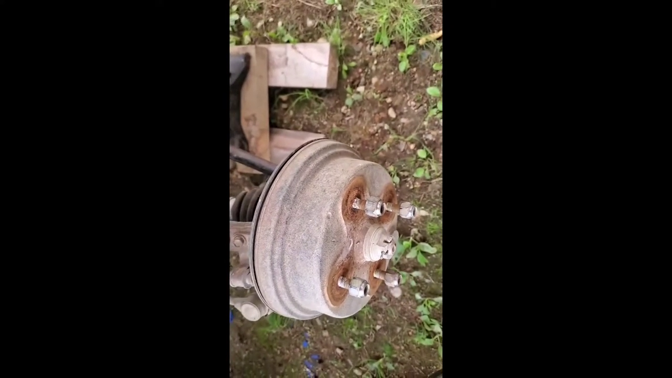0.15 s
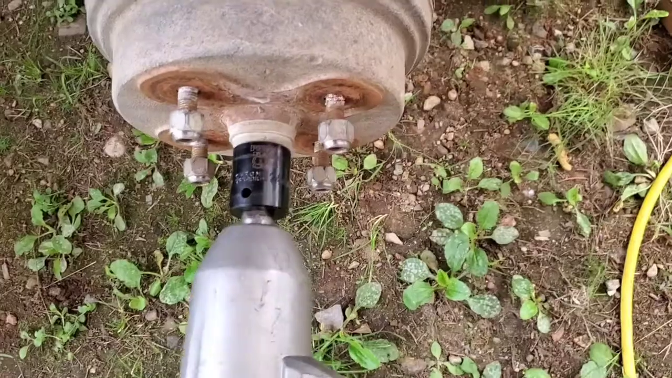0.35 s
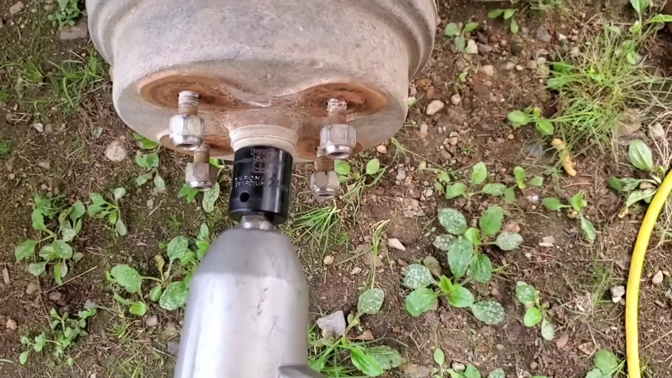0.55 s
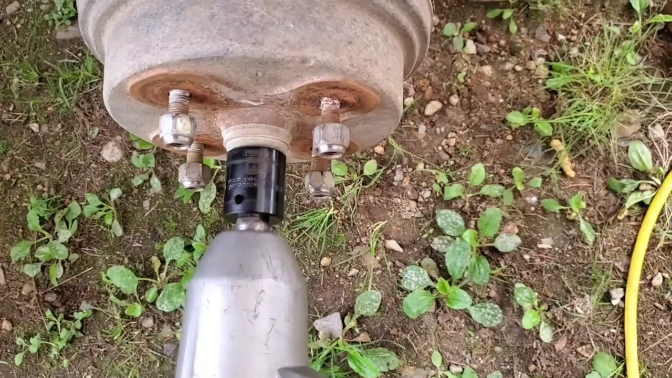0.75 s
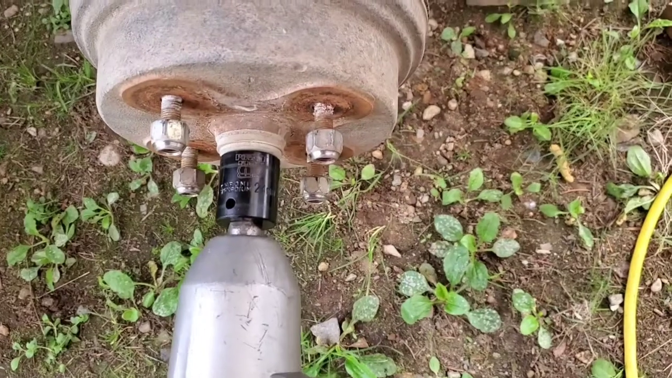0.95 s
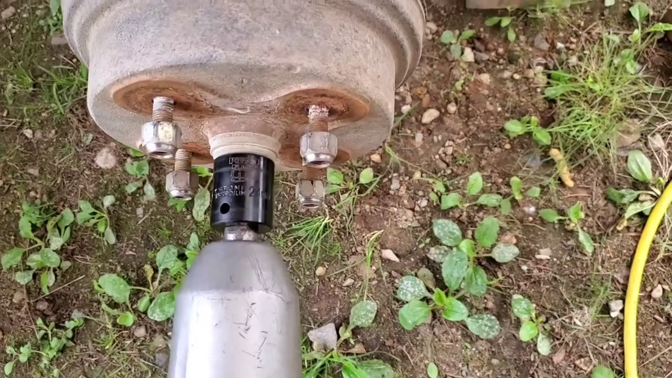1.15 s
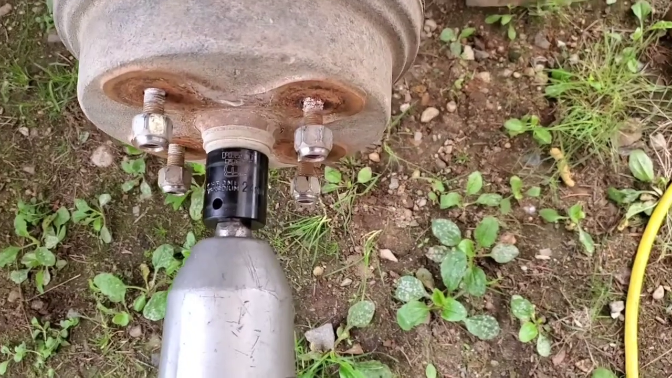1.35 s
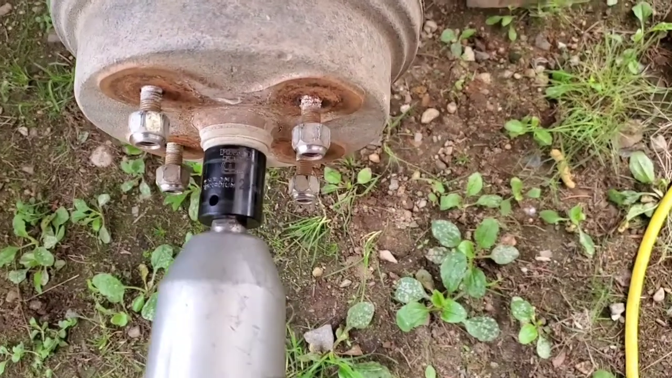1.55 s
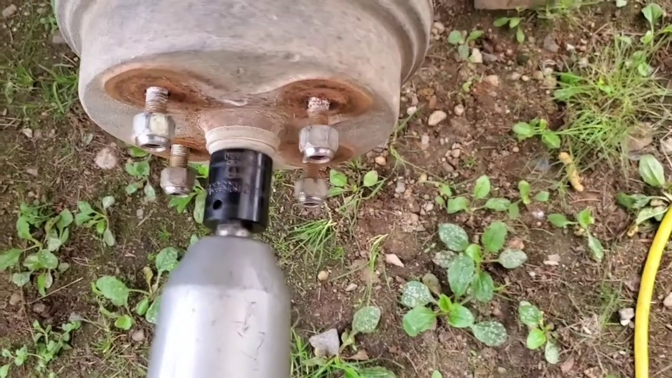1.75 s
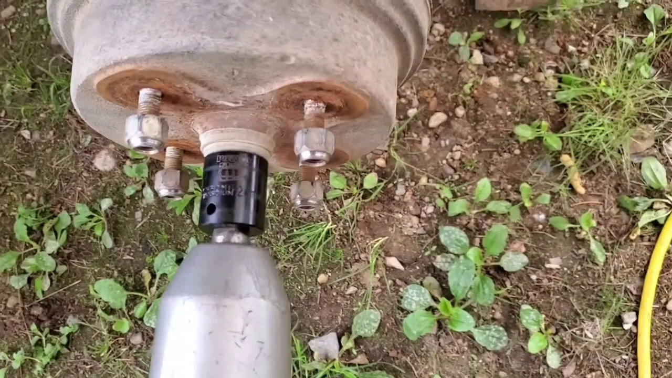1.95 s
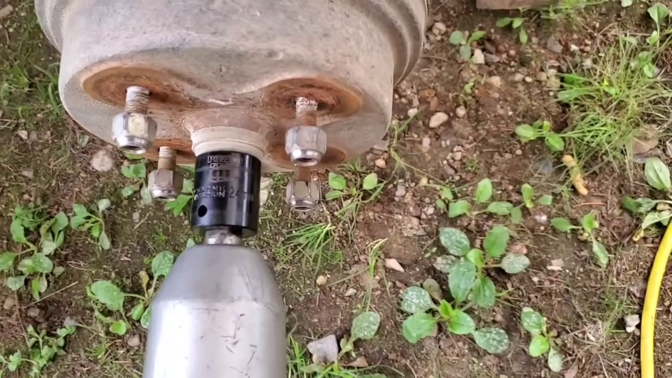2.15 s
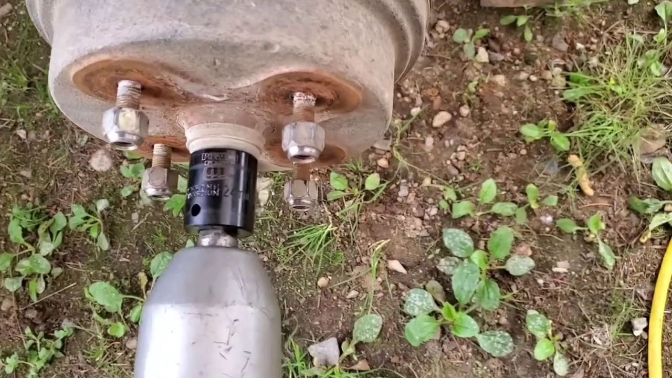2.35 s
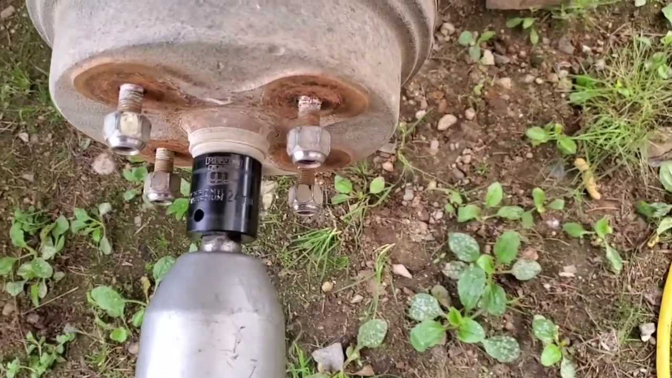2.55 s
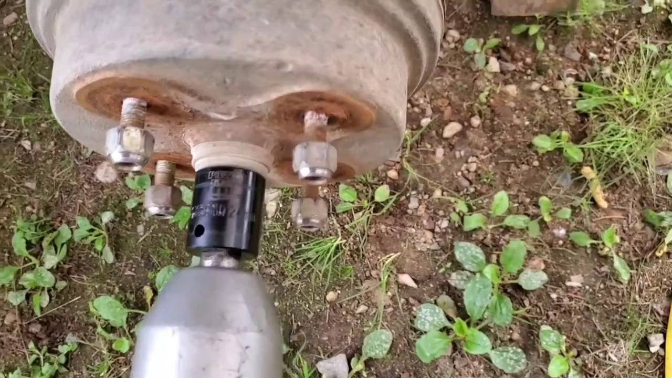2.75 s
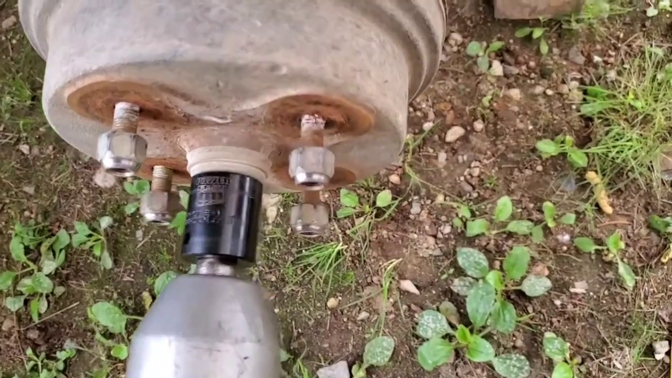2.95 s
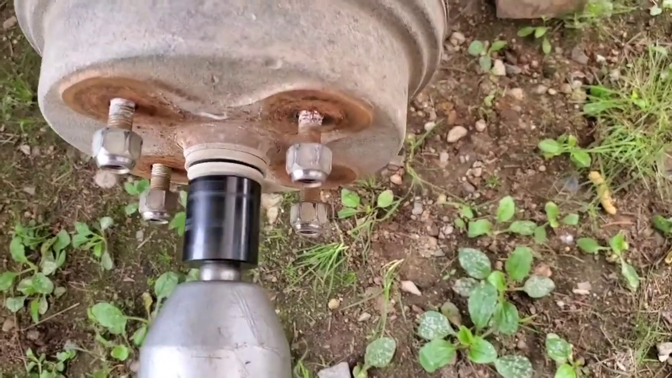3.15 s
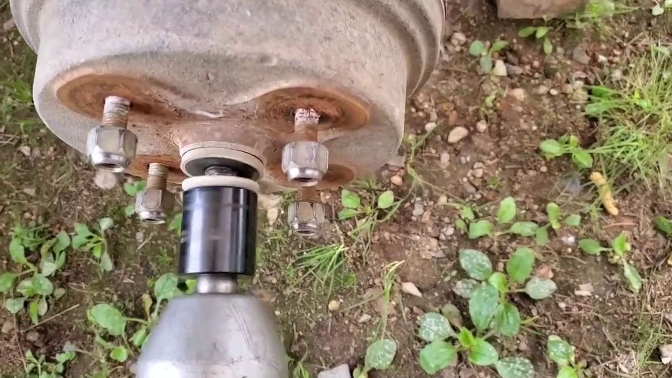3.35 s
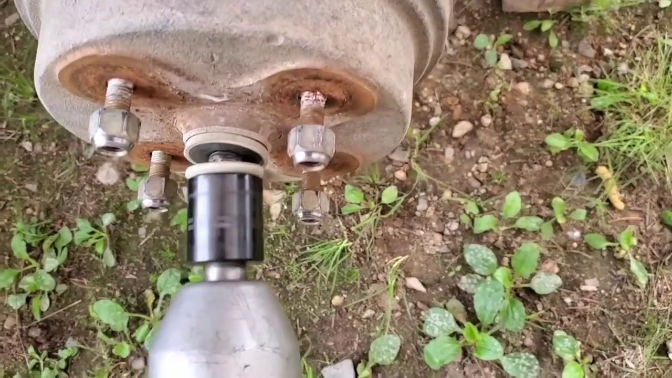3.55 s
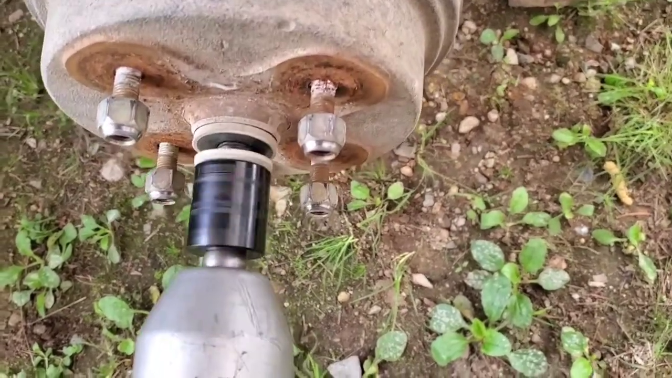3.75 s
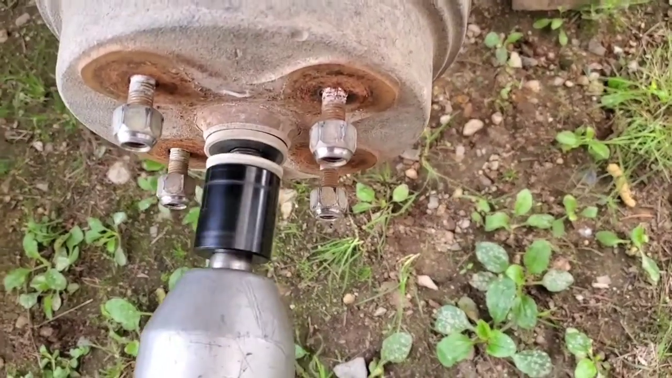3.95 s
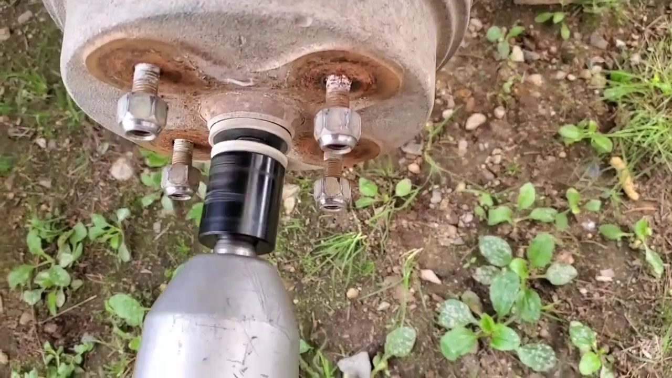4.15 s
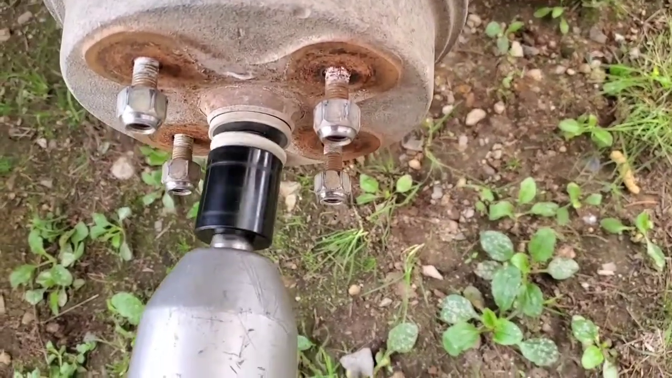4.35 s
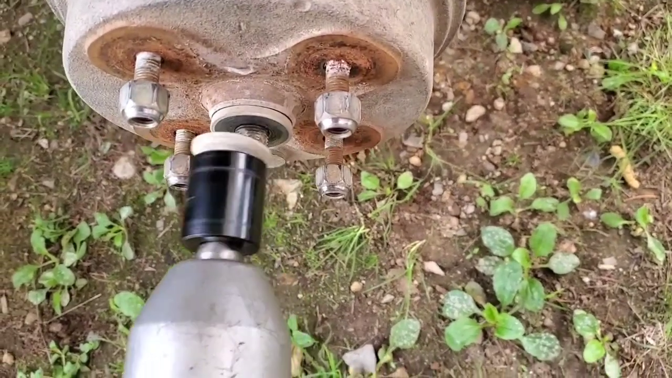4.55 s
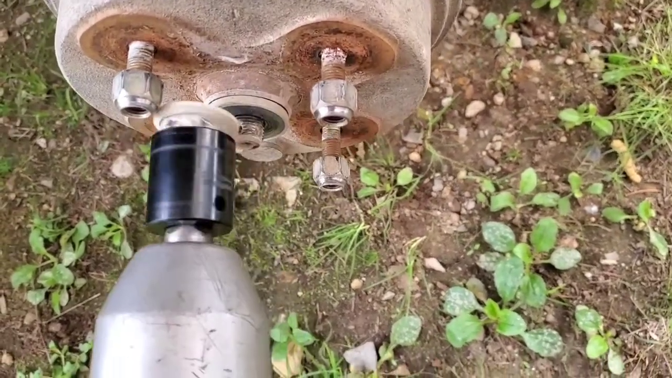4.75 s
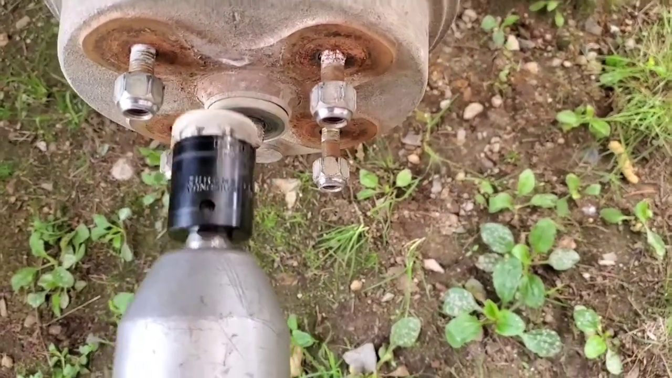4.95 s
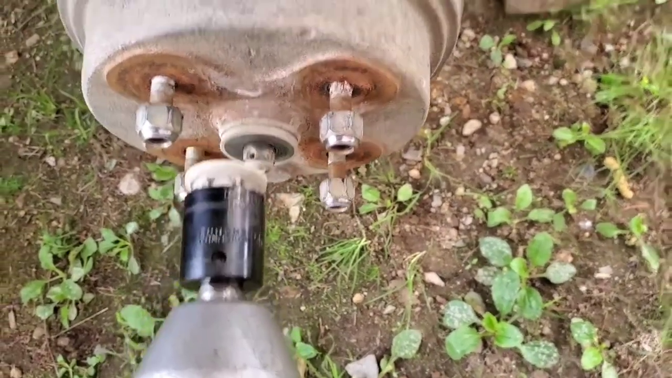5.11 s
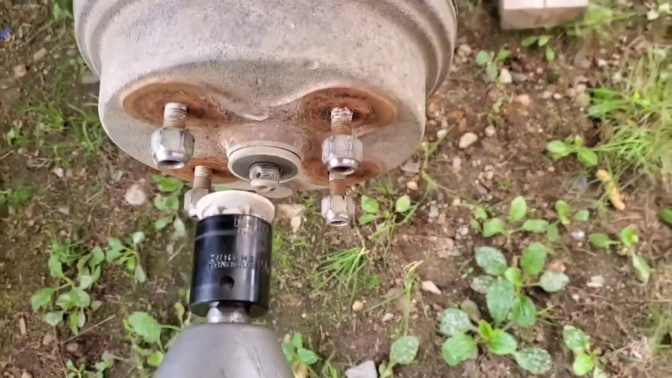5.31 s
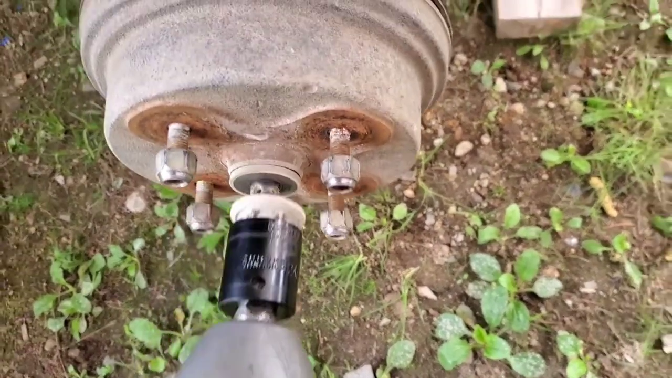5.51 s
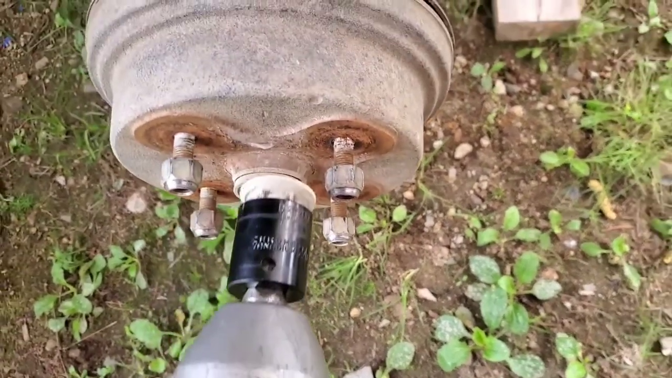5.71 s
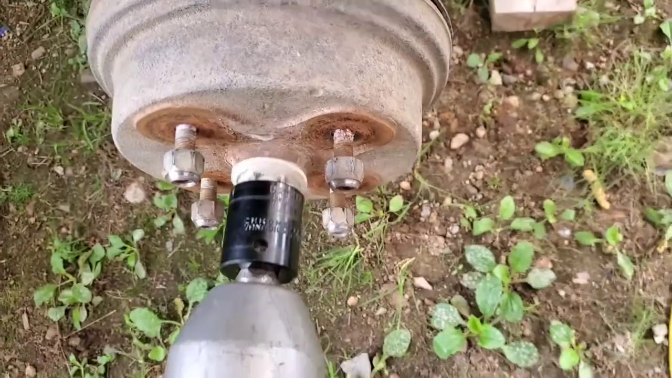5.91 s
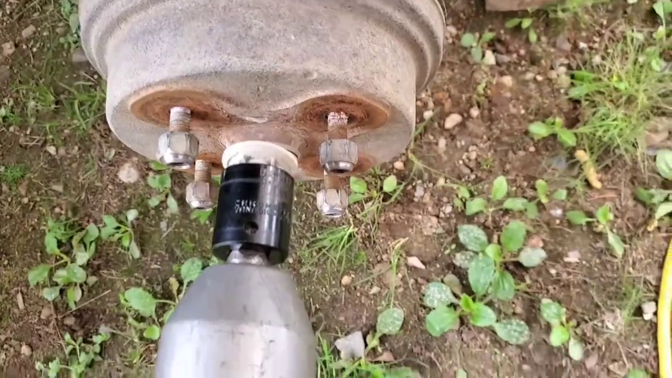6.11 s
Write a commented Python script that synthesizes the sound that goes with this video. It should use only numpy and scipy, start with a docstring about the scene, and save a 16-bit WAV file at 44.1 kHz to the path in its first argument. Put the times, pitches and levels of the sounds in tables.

```python
"""Impact wrench on a hub nut

An electric impact wrench loosens the hub nut of a brake drum, outdoors and close by. In three
bursts the hammer strikes the anvil, the socket chatters and the drum rings in its normal modes;
then the nut runs free, and the motor races and coasts down with rattling, whining gears. A low hum,
like a distant engine, lies behind, held down by gain control while the wrench is loud."""
import sys
import numpy as np
from scipy import signal
from scipy.fft import rfft, irfft, next_fast_len
from scipy.io import wavfile
from scipy.ndimage import uniform_filter1d, map_coordinates

SR = 44100
rng = np.random.default_rng(int(sys.argv[2]) if len(sys.argv) > 2 else 0)


def digitize_waveform(pressure):
    """Quantize a signal to 16-bit integers and store it at the path in sys.argv[1].

    Rows of a 2-D input are taken as channels; values are limited to [-1, 1].
    """
    field = np.atleast_2d(pressure).T
    bounded = np.clip(field, -1, 1)
    quanta = np.round(bounded * 32767).astype(np.int16)
    wavfile.write(sys.argv[1], SR, quanta)


N = 276759
T = np.arange(N) / SR

# Steady hammering, quickening as the nut gives. Each row: first and last blow in seconds, mean blows
# per second, quickening as a share of that rate, relative level in dB, thud re clang in dB.
HAMMER_RUNS = [(0.5618, 0.707, 35, 0.062, -12.5, -22.5), (0.822, 0.9165, 31.9, 0.2, -16, -27.5),
               (1.7606, 1.9535, 36.5, 0.13, -13.5, -18.5), (1.9811, 2.0892, 37.1, 0.29, -12.5, -23),
               (2.7513, 2.8788, 31.1, .32, -13.5, -19.5), (2.9083, 3.154, 40.4, .08, -14.5, -18.5)]
# The hammer catches, rebounds or runs out. Each row: time in seconds, relative level in dB.
STRAY_BLOWS = [(0.4403, -17.5), (0.4754, -18), (0.4892, -22.5), (0.5105, -12), (0.5202, -14), (0.5277, -12),
               (.551, -16.5), (0.738, -12), (.766, -14.5), (0.7744, -10.5), (0.837, -23.5), (0.866, -14),
               (0.9287, -13.5), (0.951, -17), (0.9973, -22.5), (1.0139, -14), (1.0427, -19), (1.091, -25),
               (1.6805, -14), (1.6956, -21.5), (1.7168, -15), (1.726, -17.5), (2.049, -16), (2.1075, -15),
               (2.1261, -19), (2.1365, -14), (2.1563, -22.5), (2.18, -15), (2.1964, -17), (2.2365, -23.5),
               (2.2785, -16.5), (2.3024, -17.5), (2.3411, -31), (2.3539, -25.5), (2.7287, -18.5),
               (2.7741, -17.5), (2.841, -13.5)]
# Light taps of trigger and socket. Each row: time in seconds, relative level in dB.
LIGHT_TAPS = [(.392, -63), (.4355, -24.5), (1.651, -38.5), (1.668, -35), (2.697, -43), (2.711, -38.5),
              (5.03, -57), (5.449, -68)]
# Clang of socket and hammer case. Each row: frequency in Hz, left and right relative level in dB.
CLANG_SPECTRUM = [(149, -12.5, -18), (400, -9.5, -9), (754, -6, -5.5), (1380, 1, -6.5), (2524, 1, -6),
                  (3900, -8, -2), (5500, 3, -1.5), (7000, 2, -3), (7430, 3, -12.5), (8350, -10, -5),
                  (10700, -6, -6), (11400, -6, -4), (13800, -2, -5), (15400, -0.5, -6.5)]
# Thud of the hub on its axle. Each row: frequency in Hz, relative level in dB.
THUD_SPECTRUM = [(25, -22), (80, -3), (300, -13.5), (700, -14.5), (2000, -51)]
# Modes of drum, socket and anvil. Each row: frequency in Hz, relative level in dB, T60 in seconds.
STEEL_MODES = [(245, -41.5, 1.05), (468, -45.5, 0.81), (491, -37.5, 0.75), (742, -48, 1), (875, -39.5, 0.6),
               (910, -45, .8), (2030, -31.5, .22), (2396, -18.5, 0.097), (4720, -24, 0.088),
               (4980, -16.5, .08), (6400, -19, .11), (7370, -21, .1), (10500, -37.5, 0.052),
               (11200, -32, .12)]
# Short trigger pulls. Each row: times in seconds at which the motor starts, begins to slow and stops.
SHORT_PULLS = [(.433, 0.867, 1.14), (1.655, 2.121, 2.39)]
# The pull that frees the nut, then the coasting. Each row: time in seconds, gear mesh rate in Hz.
LONG_PULL_SPEED = [(2.712, 0.5), (2.755, 590), (3.36, 905), (3.43, 880), (3.48, 805.5), (3.64, 639),
                   (4.3, 254), (4.62, 225.5), (4.98, 45), (5.08, 8), (5.22, -0.5)]
# Response of the gearbox housing. Each row: frequency in Hz, relative level in dB.
HOUSING_SPECTRUM = [(60, -19), (230, -16.5), (400, -15.5), (580, -13), (760, -0.5), (900, -2.5), (1080, -1),
                    (1500, -1.5), (1950, 1.5), (2300, 6), (2900, -0.5), (4000, -4), (5600, -4),
                    (7150, -7.5), (8200, -22), (10000, -45.5)]
# Sizzle of gears and brushes. Each row: frequency in Hz, relative level in dB.
SIZZLE_SPECTRUM = [(6000, -29), (8000, -6.5), (10200, -6), (11500, -1), (14000, 3.5), (15400, 2)]
# Partials of the gear whine. Each row: multiple of the mesh rate, relative level in dB.
WHINE_PARTIALS = [(.285, -7), (1.002, -7.5), (2, -10), (3, -11), (3.33, -8), (4, -12.5), (5, -10),
                  (6.67, -6)]
# Resonances that the whine sweeps through. Each row: frequency in Hz, gain in dB.
WHINE_RESONANCES = [(150, -28), (250, -17.5), (560, -20.5), (780, -1), (900, -12.5), (1150, 2),
                    (1450, -13.5), (1750, -5.5), (2000, -10), (2650, 2), (3600, -15), (5900, -5)]
# Stereo balance of the running tool. Each row: frequency in Hz, left minus right level in dB.
TOOL_BALANCE = [(100, -3.5), (380, 3), (700, -1), (2380, 5), (4400, -0.5), (8120, 10), (15000, 4.5)]
# Background rumble. Each row: frequency in Hz, relative level in dB.
RUMBLE_SPECTRUM = [(20, -13.5), (95, 1), (250, -16.5), (500, -24.5), (1200, -50.5)]
# Outdoor air. Each row: frequency in Hz, relative level in dB.
AIR_SPECTRUM = [(100, -7), (300, 3.5), (850, 7.5), (1800, 1), (3000, -17.5), (5500, -26.5), (6700, -17),
                (8500, -36), (12000, -22), (15500, -24)]
# A brief swell of low rumble. Each row: frequency in Hz, relative level in dB.
SWELL_SPECTRUM = [(40, -18), (90, -1), (150, -11), (300, -28), (1000, -60)]

LOADED_HZ = 759.1  # gear mesh rate against the tight nut


def blows(stray_thud_db=-22.5, thud_per_db=0.17, bite_db=9):
    """Impacts deliver the torque. Each row: time in seconds, level in dB, thud re clang in dB."""
    mean_db = np.mean(STRAY_BLOWS, axis=0)[1]
    # harder blows jolt the hub more than in proportion
    rows = [(s, db, stray_thud_db + thud_per_db * (db - mean_db)) for s, db in STRAY_BLOWS]
    for first, last, rate, quickening, db, thud_db in HAMMER_RUNS:
        progress = np.linspace(0, 1, int(round((last - first) * rate)) + 1)
        times = first + (last - first) * (progress + quickening * progress * (1 - progress) / 2)
        bite = np.sin(np.pi * progress) - 0.5  # the socket bites best in mid-run
        rows += zip(times, np.full(len(times), db), thud_db + bite_db * bite)
    return np.array(rows)


def strikes(rows, crack_s, tail_s, tail_db, repeat_share, rise_s=0.00019):
    """An impact is a broadband crack and tail; its waveform partly repeats, as the same steel is hit."""
    t, track = T[:4096], np.zeros((2, N))
    tail, rise = undb(tail_db) * np.exp(-t / tail_s), 1 - np.exp(-t / rise_s)
    repeated = np.sqrt(repeat_share) * rng.standard_normal((2, len(t)))
    for s, db in rows:
        contact = np.exp(rng.uniform(-0.12, 0.62))  # short for a square hit, long for a glancing one
        envelope = rise * (np.exp(-t / (crack_s * contact)) / np.sqrt(contact) + tail)
        fresh = np.sqrt(1 - repeat_share) * rng.standard_normal(repeated.shape)
        add(track, s, undb(db) * envelope * (repeated + fresh))
    return track


def clang(hammer, mesh_hz):
    """Brief contact of steel on steel excites a wide band, filtered differently on its way to each side."""
    hits = strikes(hammer[:, :2], crack_s=0.0011, tail_s=0.0077, tail_db=-9, repeat_share=0.3)
    knocks = np.vstack([LIGHT_TAPS, chatter(hammer[:, 0], mesh_hz)])
    taps = strikes(knocks, crack_s=0.001, tail_s=0.0089, tail_db=-15, repeat_share=0.35)
    left, right = spread(undb(7) * hits + 1.5 * taps, split_hz=3700)
    spectra = np.array(CLANG_SPECTRUM)
    return np.array([undb(2.1) * colour(left, spectra[:, :2]),
                     undb(-1.87) * colour(right, spectra[:, ::2])])


def chatter(blow_s, mesh_hz, count=200):
    """Play lets the driven socket knock on the nut. Each row: time in seconds, level in dB."""
    jitter, softness = rng.random((count, 2)).T
    times = blow_s.min() + (np.arange(count) + jitter) / count * np.ptp(blow_s)
    return np.column_stack([times, drive_db(np.interp(times, T, mesh_hz)) + 8.5 - 3 * softness])


def thud(hammer):
    """The angular impulse of each blow jolts the hub, which responds at low frequencies."""
    times, db, thud_db = hammer.T
    jolts = strikes(zip(times, db + thud_db), crack_s=0.0025, tail_s=0.033, tail_db=-10, repeat_share=0.27)
    return colour(spread(jolts, split_hz=45), THUD_SPECTRUM) * undb([[4.5], [-0.5]])


def ringing(hammer, scatter_db=3):
    """Free vibration: each blow excites the damped modes of the steel with new strengths and phases."""
    t, track = T[:SR], np.zeros((2, N))
    modes = np.array([undb(db) * np.exp(2j * np.pi * hz * t - np.log(1000) * t / t60)
                      for hz, db, t60 in STEEL_MODES])
    waves = np.vstack([modes.real, modes.imag])
    signs = np.sign(rng.standard_normal((len(hammer), 2, len(waves))))
    weights = signs * undb(scatter_db * rng.standard_normal(signs.shape)) / 2
    for (s, db, _), weight in zip(hammer, weights):
        add(track, s, undb(db) * (weight @ waves))
    return track * undb([[-0.5], [-3.5]])


def motor(mesh_hz, wobble_db=0.7, teeth_per_turn=47):
    """Amplitude modulation: the socket wobbles once a turn, swaying the rattle, whine and swish."""
    mesh_phase = 2 * np.pi * np.cumsum(mesh_hz * (1 + 0.007 * walk(110))) / SR
    grain = clatter(mesh_hz)
    gears = gear_rattle(mesh_hz, grain) + gear_whine(mesh_hz, mesh_phase)
    wobble = undb(wobble_db * np.sin(mesh_phase / teeth_per_turn))
    tool = (undb(drive_db(mesh_hz)) * gears + rotor_swish(grain)) * wobble
    lean = np.sqrt(spectrum_at(np.fft.rfftfreq(N, 1 / SR), TOOL_BALANCE))
    return irfft(rfft(tool) * np.array([lean, 1 / lean]), N)


def mesh_rate(spin_up_s=0.022):
    """Tooth contacts per second: inertia makes the motor gain and lose its speed gradually."""
    mesh_hz = np.interp(T, *np.transpose(LONG_PULL_SPEED), left=0, right=0)
    for start, slows, still in SHORT_PULLS:
        spin_up = 1 - np.exp(-np.maximum(T - start, 0) / spin_up_s)
        braking = np.interp(T, [slows, still], [1, 0])
        mesh_hz += LOADED_HZ * spin_up * braking
    return np.maximum(mesh_hz, 1e-9)


def drive_db(mesh_hz, loaded_db=-30, exponent=0.99):
    """A power law: the amplitude of gear noise grows almost in proportion to speed."""
    return loaded_db + exponent * 20 * np.log10(mesh_hz / LOADED_HZ)


def clatter(mesh_hz, air_share=0.47, knocks_per_tooth=0.6, scatter_db=2, ring_s=0.0014):
    """Powers add: random knocks, denser at speed, and the fan's steady air form one noise envelope."""
    occurs = rng.random(N) < knocks_per_tooth * (mesh_hz + 150) / SR
    knocks = occurs * undb(scatter_db * np.minimum(rng.exponential(size=N), 4))
    power = signal.lfilter([1], [1, -np.exp(-1 / (ring_s * SR))], knocks ** 2) + 1e-3
    return np.sqrt(air_share + (1 - air_share) * power / uniform_filter1d(power, size=3000))


def gear_rattle(mesh_hz, grain):
    """Forced vibration: loose teeth shake the housing, under a sizzle that grows with speed."""
    rattle = spread(casing(grain * rng.standard_normal((2, N))), split_hz=1500)
    sizzle = undb(-12.5 + mesh_hz / 75) * colour(rattle, SIZZLE_SPECTRUM)
    return undb(2) * colour(rattle, HOUSING_SPECTRUM) + sizzle


def casing(knocks, ring_s=0.015, ring_db=-7):
    """Modal overlap: the many close modes of the metal case ring like a short burst of noise."""
    t = T[:2048]
    ring = rng.standard_normal((2, len(t))) * np.exp(-t / ring_s)
    ring *= undb(ring_db) / np.sqrt(np.sum(ring ** 2) / 2)
    return unit(knocks + signal.fftconvolve(knocks, ring, axes=1)[:, :N])


def gear_whine(mesh_hz, mesh_phase, free_s=3.1, loosen_s=0.37):
    """Periodic meshing gives partials that sweep through resonances and sing out as the nut comes free."""
    freed_db = np.interp(T, [free_s - loosen_s, free_s], [-23, 0.5])
    whine = sum(undb(db + 2 * walk(14)) * spectrum_at(k * mesh_hz, WHINE_RESONANCES)
                * np.sin(k * mesh_phase) for k, db in WHINE_PARTIALS)
    return undb(freed_db) * np.sqrt(mesh_hz / LOADED_HZ) * whine


def rotor_swish(grain, peak_s=4.89, peak_db=-40, rise_db_per_s=30.5, fall_db_per_s=189):
    """A high band of noise grows and dies exponentially in the rotor's last turns."""
    level_db = peak_db - np.maximum(rise_db_per_s * (peak_s - T), fall_db_per_s * (T - peak_s))
    band = [(3500, -10.5), (5200, 15.5), (6600, 19.5), (7400, 13), (8700, -10.5), (13000, 10)]
    return undb(level_db) * colour(grain * rng.standard_normal((2, N)), band)


def reflections(direct, t60=0.27, build_s=0.011):
    """Reflection from ground, vehicle and nearby walls returns a faint, dull tail."""
    t = T[:SR // 2]
    tail = rng.standard_normal((2, len(t))) * np.exp(-np.log(1000) * t / t60) * (1 - np.exp(-t / build_s))
    echo = signal.fftconvolve(direct, tail / np.sqrt(np.sum(tail ** 2) / 2), axes=1)[:, :N]
    return undb(-22) * colour(echo, [(200, 14.5), (2500, 2), (6500, -13.5), (10000, -21), (16000, -16)])


def gain_control(wrench, threshold_db=-48.5, recover_db_per_s=15.5):
    """Compression: the gain falls by the wrench's excess over a threshold and recovers slowly."""
    power = signal.lfilter([1 / 512], [1, 1 / 512 - 1], np.mean(wrench ** 2, axis=0))
    level_db = 10 * np.log10(power + 1e-12)
    held_db = np.maximum.accumulate(level_db + recover_db_per_s * T) - recover_db_per_s * T
    return undb(-np.maximum(held_db - threshold_db, 0))


def low_swell(peak_s=4.14, width_s=0.11, peak_db=-52.5):
    """Low noise under a Gaussian envelope is heard as one brief swell of rumble."""
    envelope = undb(peak_db) * np.exp(-((T - peak_s) / width_s) ** 2)
    return envelope * colour(rng.standard_normal((2, N)), SWELL_SPECTRUM)


def outdoors(gain, hum_hz=55.4, gap_start_s=0.295, gap_end_s=0.39, fade_in_s=0.036):
    """Superposition of a wavering hum, rumble and air: a short opening scene with its own levels and a brief
    silence, then the scene changes before the first burst."""
    before = np.interp(T, [gap_start_s, gap_start_s + 0.01], [1, 0]) * (1 - np.exp(-T / fade_in_s))
    after = np.interp(T, [gap_end_s, gap_end_s + 0.015], [0, 1]) * gain
    phase = 2 * np.pi * np.cumsum(hum_hz * (1 + 0.004 * walk(3.7))) / SR
    hum = np.sqrt(2) * undb(1.5 * walk(40)) * (np.sin(phase) + undb(-28) * np.sin(2 * phase))
    rumble = colour(spread(rng.standard_normal((2, N)), split_hz=330), RUMBLE_SPECTRUM)
    air = colour(spread(rng.standard_normal((2, N)), split_hz=850), AIR_SPECTRUM) * undb(0.8 * walk(5.4))
    return (before * (undb(-57) * hum + undb(-57) * rumble + undb(-78.5) * air)
            + after * (undb(-48) * hum + undb(-56) * rumble + undb(-63.5) * air))


def undb(db):
    """Amplitude grows tenfold for every 20 dB."""
    return 10 ** (np.asarray(db) / 20)


def unit(x):
    """Normalisation to an rms of 1."""
    return x / np.sqrt(np.mean(x ** 2))


def spectrum_at(hz, points):
    """Gain by interpolation in log frequency. Each row of points: frequency in Hz, level in dB."""
    f, db = np.transpose(points)
    return undb(np.interp(np.log(hz + 1), np.log(f), db))


def colour(x, points):
    """Minimum-phase filtering to the given spectrum; white noise keeps its power."""
    size = next_fast_len(N + 8192, True)
    gain = unit(spectrum_at(np.fft.rfftfreq(size, 1 / SR), points))
    cepstrum = irfft(np.log(gain), size)
    cepstrum[1:size // 2] *= 2
    cepstrum[size // 2 + 1:] = 0
    return irfft(rfft(x, size) * np.exp(rfft(cepstrum)), size)[..., :N]


def spread(pair, split_hz):
    """Two independent signals become left and right, coherent only below split_hz."""
    coherence = 1 / (1 + (np.fft.rfftfreq(N, 1 / SR) / split_hz) ** 4)
    mid, side = irfft(rfft(pair) * np.sqrt([(1 + coherence) / 2, (1 - coherence) / 2]), N)
    return np.array([mid + side, mid - side])


def walk(rate):
    """A random fluctuation of rms 1, interpolated between `rate` values per second."""
    return unit(map_coordinates(rng.standard_normal(2048), [T * rate], order=1, mode="wrap"))


def add(track, s, sound):
    """Superpose a short sound on the track at s seconds."""
    i = max(int(s * SR), 0)
    track[..., i:i + sound.shape[-1]] += sound[..., :N - i]


def scene():
    """Sound pressures add: the wrench, its reflections and the background."""
    hammer, mesh_hz = blows(), mesh_rate()
    wrench = clang(hammer, mesh_hz) + thud(hammer) + ringing(hammer) + motor(mesh_hz)
    return wrench + reflections(wrench) + low_swell() + outdoors(gain_control(wrench))


def record(dry, cutoff_hz=15900):
    """Soft saturation rounds the highest peaks, and a low-pass filter cuts the top."""
    return signal.sosfilt(signal.ellip(8, 0.2, 70, cutoff_hz, fs=SR, output="sos"), np.tanh(dry))


dry = scene()
out = record(dry)
digitize_waveform(out)
```